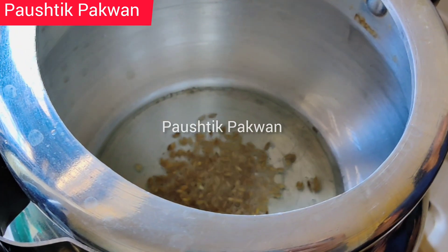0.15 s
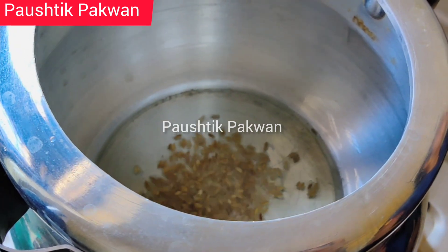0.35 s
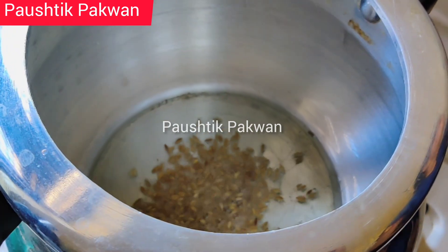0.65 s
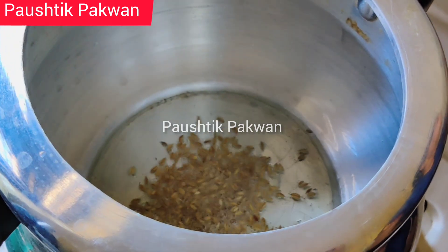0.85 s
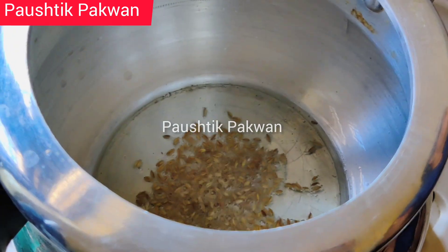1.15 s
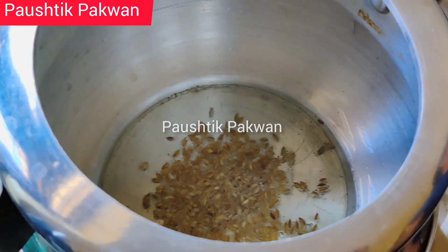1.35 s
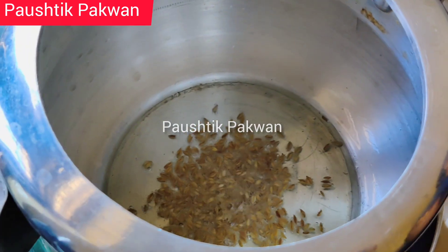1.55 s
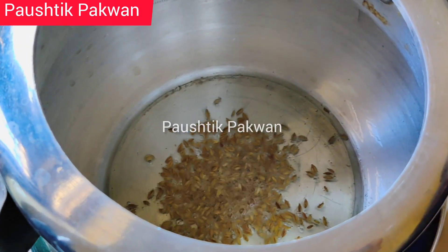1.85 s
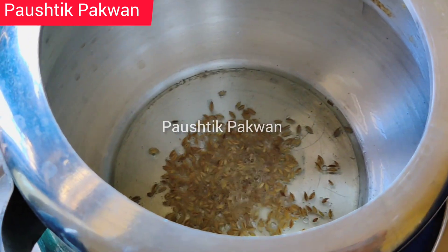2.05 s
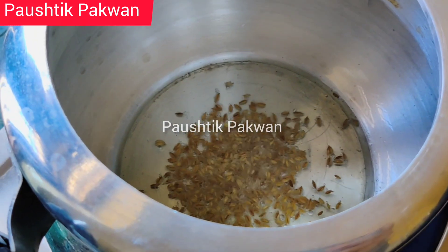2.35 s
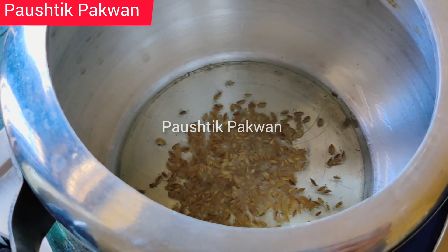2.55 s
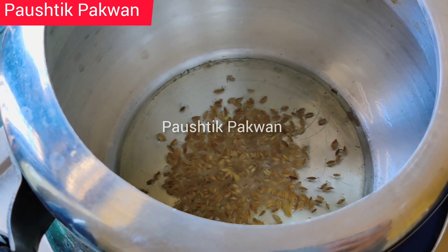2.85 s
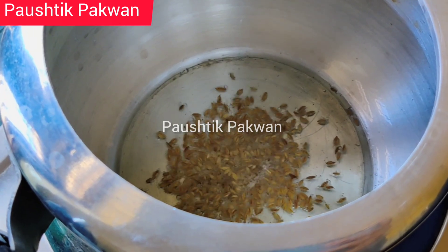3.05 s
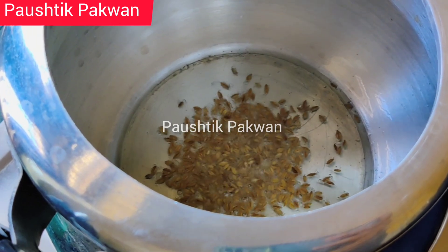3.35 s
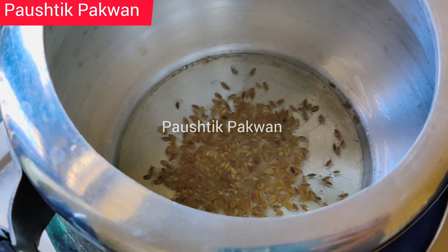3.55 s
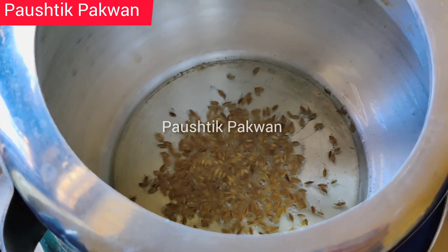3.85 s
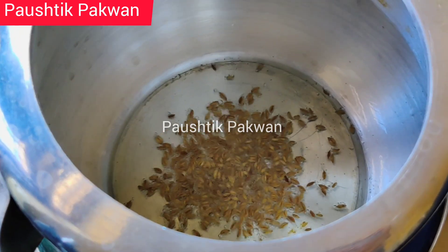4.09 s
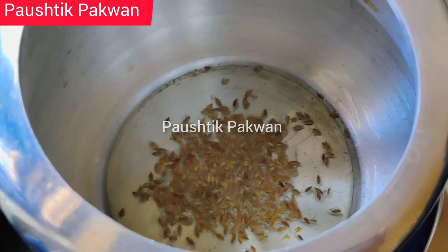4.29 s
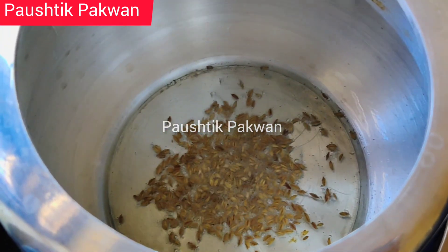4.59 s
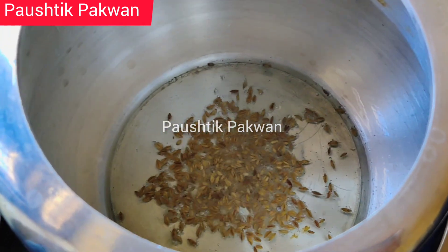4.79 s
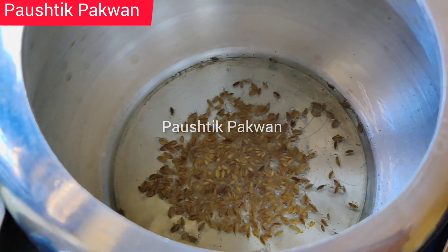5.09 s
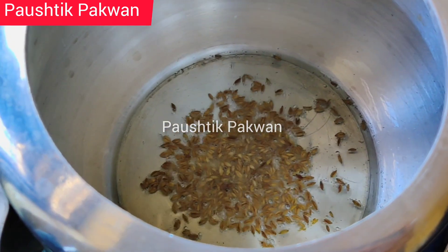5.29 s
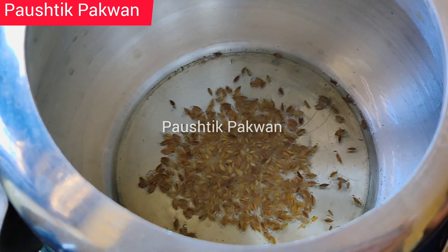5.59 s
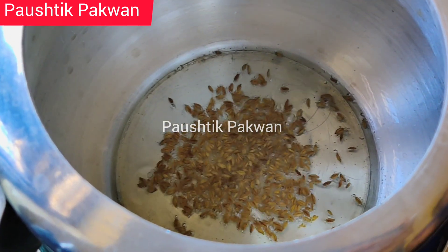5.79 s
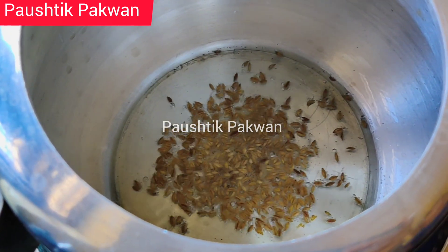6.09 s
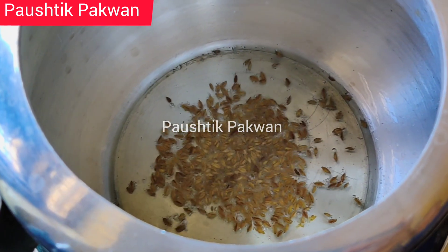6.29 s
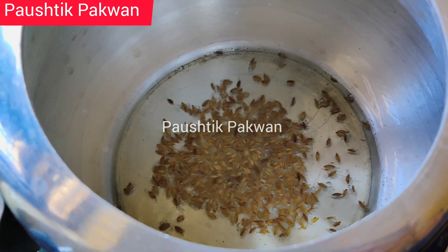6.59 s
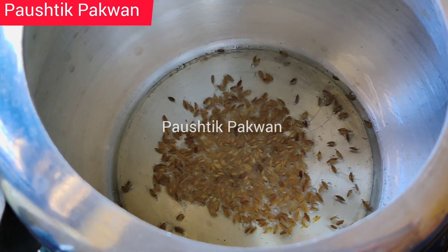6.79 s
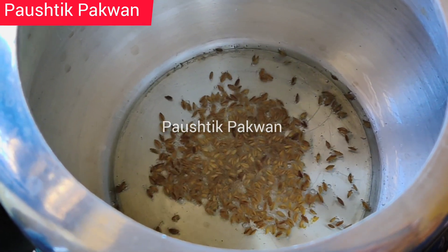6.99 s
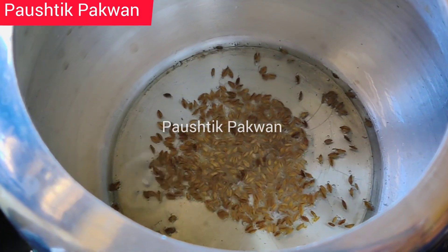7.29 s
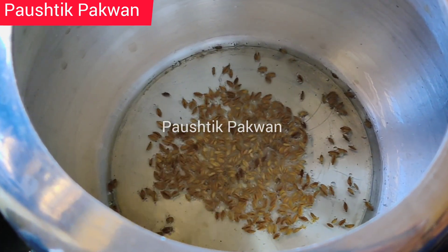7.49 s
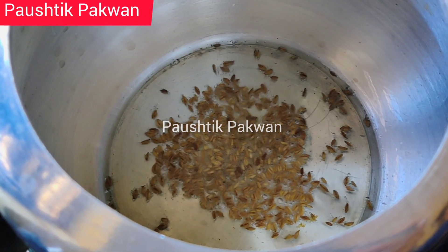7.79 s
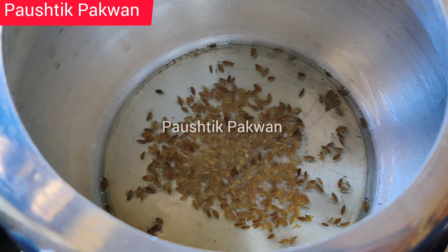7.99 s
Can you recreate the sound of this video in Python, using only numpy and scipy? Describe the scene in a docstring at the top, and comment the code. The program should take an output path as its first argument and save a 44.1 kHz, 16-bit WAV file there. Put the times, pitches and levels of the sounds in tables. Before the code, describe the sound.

Seeds crackle and pop in hot fat in a deep metal pot, ever faster, with one huge crack near 2.5 seconds over faint traffic.

```python
"""Cumin seeds fry in a little ghee in a deep metal pot: steam pockets burst as shaped noise, ever more often,
over a fine sizzle of tiny ticks and hiss. Struck modes make the pot ring faintly; noise tails answer for a small
kitchen. A drop of fat cracks on the left microphone port, and pushes there swing its signal. Farther off, things
are handled as grainy noise and a small piece of metal pings; outside, coloured noise and a hum make the traffic,
with dull booms through the floor."""
import sys
import numpy as np
from scipy import signal
from scipy.fft import rfft, irfft, next_fast_len
from scipy.io import wavfile
from scipy.ndimage import map_coordinates

SR = 44100
rng = np.random.default_rng(int(sys.argv[2]) if len(sys.argv) > 2 else 0)


def transcribe(signal):
    """Save signal, clipped to [-1, 1], as a 16-bit WAV file at the path in sys.argv[1]."""
    frames = np.atleast_2d(signal).T
    limited = np.clip(frames, -1, 1)
    pcm = np.round(limited * 32767).astype(np.int16)
    wavfile.write(sys.argv[1], SR, pcm)


N = 358974

# colour of a steam burst: f/Hz, level/dB
BURST_COLOUR = [(300, -31), (1000, -19), (2300, -19.5), (3000, -18), (4300, -6), (5600, 2.5), (6500, 6.5),
                (7100, -6), (8500, -9.5), (15000, -37.5)]
# colour of the torn film: f/Hz, level/dB
SNAP_COLOUR = [(300, -16), (1500, -20.5), (5000, 1), (8000, 22), (11000, 13), (15500, 10)]
# modes of the pot's base: f/Hz, relative energy/dB, t60/s
BASE_MODES = [(403, -2.5, 0.062), (451, -5.5, 0.1), (564, -9, 0.027)]


def amp(db):
    """Decibels to gain."""
    return 10 ** (np.asarray(db) / 20)


def unit(x):
    """Scale to rms 1."""
    return x / np.sqrt(np.mean(x ** 2) + 1e-20)


def packet(x):
    """Give each channel the energy of 10 ms at rms 1."""
    energy = np.sum(x ** 2, axis=-1, keepdims=True)
    return x * np.sqrt(SR / 100 / (energy + 1e-20))


def along(points, hz):
    """Read (Hz, value) points on a log frequency axis."""
    f, v = np.transpose(points)
    return np.interp(np.log(hz + 1), np.log(f), v)


def curves(rows):
    """One value per sample for each column after the time."""
    s, *cols = np.transpose(rows)
    return [np.interp(np.arange(N) / SR, s, c) for c in cols]


def wobble(rate):
    """A smooth random curve, rate knots a second."""
    knots = rng.standard_normal(int(N * rate / SR) + 4)
    return map_coordinates(knots, [np.arange(N) * rate / SR])


def bell(t, s, half):
    """A smooth swell from 0 to 1 and back, centred on time s; 1/e at half seconds either side."""
    return np.exp(-((t - s) / half) ** 2)


def fade(t, t60):
    """Exponential decay by 60 dB in t60 seconds."""
    return np.exp(-np.log(1000) * t / t60)


def grainy(t, depth_db, grain_s):
    """A random gain that changes from grain to grain."""
    knots = rng.standard_normal(len(t) // 16 + 2)
    return amp(depth_db * np.interp(t / grain_s, np.arange(len(knots)), knots))


def coloured(x, gain_db):
    """Causal minimum-phase filter whose gain in dB is a function of frequency."""
    m = 2 * next_fast_len(x.shape[-1] // 2 + 2048)
    cepstrum = irfft(np.log(amp(gain_db(np.fft.rfftfreq(m, 1 / SR)))))
    # folding the cepstrum onto positive time makes the filter causal
    cepstrum[1:m // 2] *= 2
    cepstrum[m // 2 + 1:] = 0
    response = np.exp(rfft(cepstrum))
    return irfft(rfft(x, m) * response, m)[..., :x.shape[-1]]


def noise(size, alike):
    """White stereo noise; alike is the share of power common to both sides."""
    alike = np.clip(alike, 0, 1)
    common = rng.standard_normal(size)
    separate = rng.standard_normal((2, size))
    return np.sqrt(alike) * common + np.sqrt(1 - alike) * separate


def ring(modes, t, scatter_db, drift_hz=6):
    """Struck modes build up within a cycle, at new strengths per blow and side; wandering phase broadens them."""
    total = 0
    for hz, db, t60 in modes:
        strength = amp(db + scatter_db * rng.standard_normal((2, 1))) / np.sqrt(t60)
        envelope = fade(t, t60) * (1 - np.exp(-2 * hz * t))
        steps = rng.standard_normal(len(t)) * np.sqrt(abs(drift_hz) / (2 * np.pi * SR))
        cycles = hz * t + rng.random((2, 1)) + np.cumsum(steps)
        total = total + strength * envelope * np.sin(2 * np.pi * cycles)
    return packet(total)


def sides(pan_db):
    """Left and right gains for a level difference."""
    return unit(amp([[pan_db / 2], [-pan_db / 2]]))


def add(track, s, x):
    """Mix x into the track from time s."""
    i = round(s * SR)
    track[..., i:i + x.shape[-1]] += x[..., :N - i]


def street(rumble_trim_db=.5, drone_trim_db=1, hum_hz=220.7):
    """Traffic through walls: rumble swells with each vehicle, the drone rises or dips, over wash and a hum."""
    # slow levels before trims and passes: t/s, rumble level/dB, drone level/dB, wash level/dB
    levels = [(0, -53, -60, -49), (1.9, -47, -53.5, -55), (2.8, -47.5, -58.5, -59),
              (5.3, -53, -56.5, -64.5), (6.2, -53.5, -61, -61), (8.14, -56.5, -62.5, -74)]
    # vehicles going by: t/s, half length/s, rumble swell/dB, drone change/dB
    passes = [(.4, 0.9, 6.5, 8.5), (1.223, 0.33, 6, -2), (3.27, 0.16, 6.5, 0), (4.197, 0.19, 9, -4.5),
              (5.153, 0.39, 9, -0.5), (5.5, 0.18, 2.5, 5)]
    # low rumble: f/Hz, level/dB
    rumble_colour = [(15, -19), (35, -4.5), (52, 5), (68, -1), (85, -14.5), (110, -11), (150, -36.5),
                     (400, -66)]
    # drone: f/Hz, level/dB
    drone_colour = [(70, -6.5), (120, -16.5), (150, -5), (215, 0), (260, 1.5), (320, -8), (430, -8),
                    (700, -15), (2000, -45)]
    # wash of tyres: f/Hz, level/dB
    wash_colour = [(200, -24), (520, 4.5), (900, 3.5), (1800, 1), (3200, 2), (6000, -43), (15000, -78)]
    t = np.arange(N) / SR
    rumble_db, drone_db, wash_db = curves(levels)
    for s, half, rumble_swell_db, drone_change_db in passes:
        rumble_db = rumble_db + rumble_swell_db * bell(t, s, half)
        drone_db = drone_db + drone_change_db * bell(t, s, half)

    def bed(colour, alike):
        return unit(coloured(noise(N, alike), lambda f: along(colour, f)))

    rumble = amp(rumble_db + rumble_trim_db) * bed(rumble_colour, alike=0.99)
    drone = amp(drone_db + drone_trim_db + wobble(3.2)) * bed(drone_colour, alike=0.96)
    wash = amp(wash_db + 1.6 * wobble(8.8)) * bed(wash_colour, alike=0.44)
    # an engine's hum draws away, 2.7 dB a second, and swells once
    hum_db = -57 - 2.7 * t + 13.5 * bell(t, s=.52, half=0.25)
    hum_phase = 2 * np.pi * np.cumsum(hum_hz + 2.32 * wobble(9.3)) / SR
    hum = amp(hum_db) * np.sqrt(2) * np.sin(hum_phase)
    return rumble + drone + wash + hum


def thuds():
    """Dull booms through the floor: low sines of wavering phase swell and die away."""
    # booms: t/s, peak level/dB, f/Hz, half length/s
    booms = [(0.135, -43, 77.2, 0.44), (0.798, -44.5, 95, 0.13), (3.518, -42.5, 99, 0.052),
             (6.434, -53, 109, 0.13)]
    t = np.arange(N) / SR
    out = np.zeros(N)
    for s, db, hz, half in booms:
        out += amp(db) * bell(t, s, half) * np.sin(2 * np.pi * hz * t + wobble(8.3))
    return out


def clatter(slope_db=3.5, grain_db=2.0, uneven_db=1.94, contact_db=-5, room_t60=0.78):
    """Distant scrapes and knocks: grainy noise, each with its own resonances, and mostly room sound."""
    # things handled across the kitchen: t/s, level/dB, rise/s, centre f/Hz
    moves = [(.426, -37, .008, 740), (.86, -39.5, 0.1, 940), (3.0, -50, 0.029, 1030),
             (3.24, -40, .013, 1390), (3.486, -31, 0.025, 1340), (3.865, -47.5, 0.01, 1960),
             (4.02, -44, 0.0078, 716), (4.47, -47, 0.13, 1160), (5.698, -40.5, 0.028, 1620),
             (6.789, -49, .023, 1640), (8.061, -51, 0.03, 1030)]
    # colour they all share: f/Hz, level/dB
    worktop = [(350, 3.5), (600, 6), (900, 2), (1400, 0.5), (2000, 1.5), (3000, 1.5)]
    # modes of a struck dish: f/Hz, relative energy/dB, t60/s
    dish_modes = [(603, -8, .3), (900, -7, .18), (1206, 0, .28), (1770, -14, .3)]
    out, t = np.zeros((2, N)), np.arange(SR) / SR
    lead = .2  # s of rise before the contact
    for s, db, rise, hz in moves:
        swell = np.exp(np.minimum(t - lead, 0) / rise) * fade(np.maximum(t - lead, 0), room_t60)
        swell *= 1 + amp(contact_db) * bell(t, lead, 0.0074)  # the contact stands out of its echo
        grain = grainy(t, grain_db, grain_s=0.0073)
        ripple = np.c_[np.geomspace(200, 8000, num=50), rng.standard_normal(size=50)]

        def body(f):
            distance = np.minimum(np.log2((f + 1) / hz) ** 2, 12)  # squared octaves from the centre
            return uneven_db * along(ripple, f) + along(worktop, f) - slope_db * distance

        add(out, s - lead, amp(db) * swell * unit(coloured(grain * noise(len(t), 0.087), body)))
    # the first knock is against a dish
    dish = ring(dish_modes, t, scatter_db=0.5, drift_hz=3.5) * (1 - np.exp(-t / 0.0041))
    add(out, moves[0][0], amp(-25.5) * dish)
    return sides(-3.0) * out


def ping(s=4.4215, level_db=-22, blur=0.52, scrape_db=-16):
    """A small piece of metal is grazed and rings; the room blurs its tones."""
    # metal modes: f/Hz, relative energy/dB, t60/s
    metal_modes = [(4370, -6.5, .5), (8506, 0, .4), (13474, -11, .32), (13508, -12, .3)]
    # colour of the scrape that starts the ping: f/Hz, level/dB
    graze_colour = [(4000, -18), (7500, -8), (8400, 4), (9500, -25), (12500, 0), (13500, -6), (15000, -25)]
    out, t = np.zeros((2, N)), np.arange(SR) / SR
    tones = ring(metal_modes, t, scatter_db=0, drift_hz=8)
    room = noise(len(t), 0) * fade(t, .36)
    diffuse = signal.fftconvolve(tones * fade(t, .012), room, axes=1)[:, :len(t)]
    scrape = coloured(noise(len(t), 0) * fade(t, 0.22), lambda f: along(graze_colour, f))
    sound = packet(tones + blur * packet(diffuse)) + amp(scrape_db) * packet(scrape)
    add(out, s, amp(level_db) * sides(-7) * sound * (1 - np.exp(-t / .002)))
    return out


def splashes(leak_s=0.55, coupling_hz=4.17):
    """A push on the left port leaks away; the microphone's bass roll-off makes it swing back."""
    # pushes before the roll-off: t/s, level/dB, rise/s, share that comes at once
    pushes = [(2.489, 9.5, 0.017, 0.1), (3.624, -17, 0.018, 0.045)]
    out, t = np.zeros((2, N)), np.arange(N) / SR
    for s, db, rise, sudden in pushes:
        push = (1 - (1 - sudden) * np.exp(-t / rise)) * np.exp(-t / leak_s)
        add(out[0], s, -amp(db) * push)
    b, a = signal.butter(1, coupling_hz, "high", fs=SR)
    return signal.lfilter(b, a, signal.lfilter(b, a, out))


def sizzle(rate=260, spread_db=-0.5, ticks_db=-6, hiss_db=-2):
    """Tiny bubbles tick round the seeds at random, rate a second; the smallest merge into a hiss."""
    # sizzle level over time, before the mix of ticks and hiss scales it: t/s, level/dB
    levels = [(0, -46), (1, -48), (1.9, -49.5), (3, -52.5), (4, -46.5), (5, -52), (6, -48), (7, -50.5),
              (8.14, -50.5)]
    # colour of the frying fat: f/Hz, level/dB
    fizz_colour = [(300, -5), (2000, -5), (3300, -1.5), (4500, 3), (6400, 8.5), (7200, -1), (8500, -9),
                   (15000, -16)]
    level_db, = curves(levels)
    spread = amp(spread_db * np.minimum(rng.exponential(size=N), 4))
    sizes = (rng.random(N) < rate / SR) * spread
    t = np.arange(SR // 20) / SR
    bubbles = signal.fftconvolve(sizes, fade(t, 0.019))[:N] * noise(N, 0)
    fat = amp(ticks_db) * unit(bubbles) + amp(hiss_db) * noise(N, 0)
    return amp(level_db) * np.std(fat) * unit(coloured(fat, lambda f: along(fizz_colour, f)))


def ticks(rate=13, loudest_db=-39, range_db=24, snap_db=-5, knock_db=-10):
    """Small bursts between the loud ones, rate a second on average, more frequent as the seeds heat up."""
    out, t = np.zeros((2, N)), np.arange(SR // 12) / SR
    for when, size in rng.random((round(rate * N / SR), 2)):
        spit = noise(len(t), 0.12) * (fade(t, 0.024) + 0.039 * fade(t, 0.065))
        tick = packet(coloured(spit, lambda f: along(BURST_COLOUR, f)))
        tick += amp(snap_db) * packet(coloured(spit, lambda f: along(SNAP_COLOUR, f)))
        tick += amp(knock_db) * ring(BASE_MODES, t, scatter_db=1.5)[0]
        s = when ** .6 * (N - 1) / SR  # crowds the bursts towards the end
        add(out, s, amp(loudest_db - range_db * size) * tick)
    return out


def character(db, hz, spit_t60, snap):
    """Resonance, knock and echo of a burst in dB, from its level, pitch, length and sharpness."""
    # all relative to a usual burst: -29 dB, 5000 Hz, 13 ms, snap -15 dB
    louder, octaves = db + 29, np.log2(hz / 5000)
    doublings, sharper = np.log2(spit_t60 / .013), snap + 15
    # big pockets, and those that open softly, keep their shape and ring more
    resonance_db = 8.5 - 0.4 * sharper - 6 * octaves
    # sharp bursts and big, low pockets knock hardest; the knock grows less than the burst does
    knock_db = -27 + 0.43 * sharper - 9 * octaves - 0.26 * louder
    # long spits and low pockets leave more splatter and echo
    echo_db = -2.5 + 3.5 * doublings - 4.5 * octaves
    return resonance_db, knock_db, echo_db


def pops(attack_s=0.00013, crack_t60=0.02, spit_stretch=1.82, cavity_db=-4, cavity_t60=0.096,
         room_db=-2, room_t60=0.5, pocket_octaves=0.22, base_trim_db=-2, base_db_per_s=0.8, wall_db=-22):
    """Steam pockets tear open and spit, echoing in pot and kitchen; a drop on the left port is made alike."""
    # bursts, but the row at 2.4897 s is a drop of fat landing on the left microphone port:
    # t/s, level over 10 ms/dB, pocket f/Hz, spit t60 before stretching/s, snap level/dB, L-R level/dB
    bursts_and_drop = [(.211, -26.5, 5000, 0.012, -4.5, -2), (.225, -46, 5830, 0.031, -12, -5),
                       (0.396, -33.5, 3300, 0.019, -14, 10), (0.9682, -43, 3050, 0.031, -22, -13),
                       (1.3, -39, 3240, .01, -4, 0), (1.5459, -31.5, 4660, 0.013, -10.5, 3),
                       (2.0707, -21, 3300, 0.0055, -9, -3), (2.1117, -28, 4430, 0.021, -18, 2),
                       (2.273, -29.5, 5170, 0.017, -7, -2), (2.306, -27, 4830, 0.016, -22, -8),
                       (2.4838, -24, 6000, 0.011, -7.5, -7), (2.4897, -27.5, 3160, 0.001, -24, 17),
                       (2.7187, -43, 6700, 0.0037, -10, -10), (3.2736, -36, 3670, 0.0088, -7.5, 1),
                       (3.394, -31.5, 5970, 0.0069, -13, 7), (3.407, -29.5, 6660, 0.037, -8.5, -2),
                       (3.669, -34, 6660, 0.007, -15, -7), (3.926, -28, 6400, 0.012, -38, -3),
                       (4.0325, -28.5, 4800, 0.017, -5.5, -1), (4.1553, -36.5, 7100, 0.021, -49, -3),
                       (4.2911, -26.5, 5300, 0.01, -15, 2), (4.3828, -23, 6000, 0.017, -40, -1),
                       (4.4892, -26.5, 5840, .02, -14, 3), (4.6783, -36, 5760, .008, -32, 2),
                       (4.698, -31.5, 6760, 0.025, -28, -8), (4.785, -29.5, 5770, .009, -6.5, -4),
                       (4.842, -30, 6500, 0.021, -5, 0), (4.914, -31.5, 5900, 0.022, -7.5, 0),
                       (5.0918, -37.5, 3270, 0.003, -6, 0), (5.121, -32, 5030, 0.022, -17, 1),
                       (5.2046, -28, 6400, 0.0076, -8, -2), (5.235, -28.5, 6360, 0.016, -35, -1),
                       (5.2457, -21, 5800, 0.0058, -27, 3), (5.288, -20.5, 7000, 0.0097, -10, -0.5),
                       (5.3666, -37.5, 6760, .016, -15, -9), (5.507, -30.5, 5760, 0.008, -38, 1),
                       (5.5392, -27.5, 5800, 0.017, -27, 2), (5.5914, -30, 7400, 0.021, -26, 9),
                       (5.615, -26, 5660, 0.012, -38, -1), (5.6958, -26, 4560, 0.018, -29, 1),
                       (5.8635, -23, 5300, 0.024, -17, 1), (5.878, -25, 5840, 0.0054, -20, -1),
                       (5.9727, -31.5, 7000, .008, -6.5, -5), (6.0913, -31.5, 6800, 0.0085, -42, -3),
                       (6.1248, -32, 3230, 0.014, -19, -3), (6.1763, -37, 6070, 0.011, -4, -5),
                       (6.2345, -34, 4030, .006, -5.5, 2), (6.2563, -24.5, 6300, 0.025, -14, -6),
                       (6.2768, -22.5, 5700, 0.012, -33, 6), (6.3791, -26, 3780, 0.004, -10.5, 1),
                       (6.507, -34, 7460, 0.0089, -7, 0), (6.5396, -38, 5070, 0.015, -7, -1),
                       (6.587, -31.5, 3800, 0.024, -23, 4), (6.721, -25, 4540, 0.013, -18, 3),
                       (6.7677, -28.5, 3270, 0.018, -27, 1), (6.8749, -35, 7400, 0.015, -4, 1),
                       (6.9006, -30, 6500, .013, -15, -10), (6.9434, -33.5, 4740, 0.022, -19, 0),
                       (6.9792, -30.5, 6500, .014, -33, -6), (7.1675, -32, 4020, 0.033, -14, 8),
                       (7.3091, -23, 6400, 0.012, -8.5, 1), (7.3851, -27.5, 5500, 0.014, -32, -3),
                       (7.4307, -29.5, 6050, 0.014, -30, 1), (7.579, -22.5, 3680, 0.011, -7, 4),
                       (7.605, -38.5, 2960, 0.0062, -3, -18), (7.6741, -22.5, 7440, 0.026, -18, 2),
                       (7.727, -31, 6200, .011, -23, -6), (7.7827, -22.5, 5210, 0.0058, -12.5, 1),
                       (7.8517, -23.5, 5900, 0.0095, -45, 0), (8.0991, -28, 6400, 0.011, -6, -3)]
    # echoes are fuller around 3 kHz than the burst: f/Hz, level/dB
    echo_colour = [(1500, -3), (3200, 8), (6000, -3), (12000, -1)]
    # modes of the pot's wall: f/Hz, relative energy/dB, t60/s
    wall_modes = [(1312, -0.5, 0.26), (2538, 2.5, 0.71), (3383, 7.5, 0.34), (3630, -30, .25),
                  (4140, 6.5, 0.23)]
    out, t = np.zeros((2, N)), np.arange(SR // 2) / SR
    onset = 1 - np.exp(-t / attack_s)

    def puff(t60, alike):
        return packet(noise(len(t), alike) * onset * fade(t, t60))

    for s, db, hz, spit_t60, snap, pan in bursts_and_drop:
        pocket_db, knock, echo_db = character(db, hz, spit_t60, snap)
        # escaping steam, and the short tear that starts with it
        spit = puff(spit_stretch * spit_t60, 0.26) + 0.78 * puff(0.0039, 0.093)
        # flung droplets and single bounces off the wall
        splatter = grainy(t, depth_db=1, grain_s=0.00158)
        cavity = packet(splatter * puff(cavity_t60, 0))
        echoes = packet(amp(cavity_db) * cavity + amp(room_db) * puff(room_t60, 0))

        def pocket(f):
            # the open pocket resonates at its own pitch
            return pocket_db / (1 + (np.log2((f + 1) / hz) / pocket_octaves) ** 2)

        # the spit is over before the pocket rings fully, so the resonance is clearest in the tail
        direct = packet(coloured(spit, lambda f: along(BURST_COLOUR, f) + 0.84 * pocket(f)))
        late = packet(coloured(echoes, lambda f: along(BURST_COLOUR, f) + pocket(f) + along(echo_colour, f)))
        torn = puff(crack_t60, 0.23) + .9 * spit + 1.23 * echoes
        tear = packet(coloured(torn, lambda f: along(SNAP_COLOUR, f)))
        add(out, s, amp(db) * (sides(pan) * (direct + amp(snap) * tear) + amp(echo_db) * late))
        # bursts knock the base, which answers more as the fat heats up, and set the wall ringing
        base_gain = amp(knock + base_trim_db + base_db_per_s * s)
        base = base_gain * ring(BASE_MODES, t[:SR // 10], scatter_db=1.5)[0]
        wall_gain = amp(wall_db) + 1.8 * amp(knock)
        wall = wall_gain * ring(wall_modes, t[:SR // 4], scatter_db=2.0, drift_hz=17.4)
        add(out, s, amp(db) * base)
        add(out, s, amp(db) * wall)
    return out


def scene():
    """Everything heard from just above the pot; the street reaches the left port a little earlier."""
    outside = street() + thuds()
    outside[1] = np.roll(outside[1], 12)  # samples
    kitchen = clatter() + ping()
    pot = splashes() + sizzle() + ticks() + pops()
    return outside + kitchen + pot


def record(dry, top=0.99, hardness=7, band_limit_hz=15900):
    """The input saturates smoothly towards top, then a low-pass removes the treble above the band limit."""
    clipped = dry / (1 + np.abs(dry / top) ** hardness) ** (1 / hardness)
    low_pass = signal.firwin(201, band_limit_hz, fs=SR)
    return signal.fftconvolve(clipped, low_pass[None], "same", axes=1)


dry = scene()
out = record(dry)
transcribe(out)
```